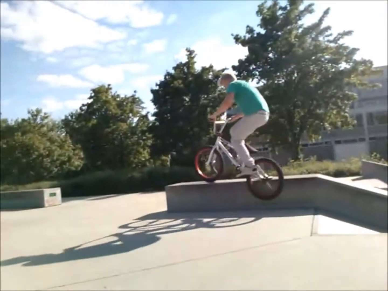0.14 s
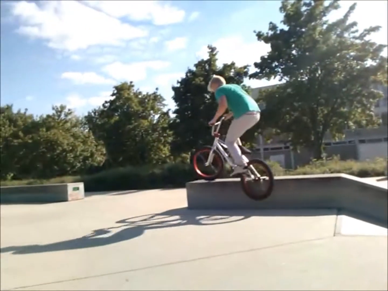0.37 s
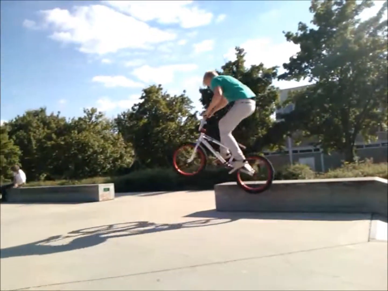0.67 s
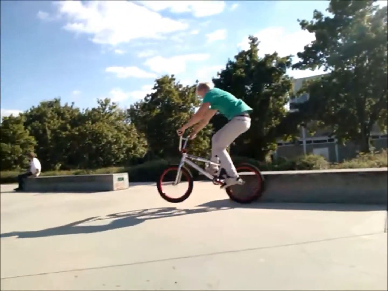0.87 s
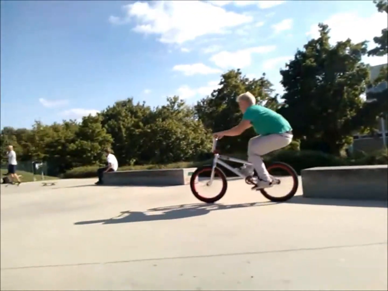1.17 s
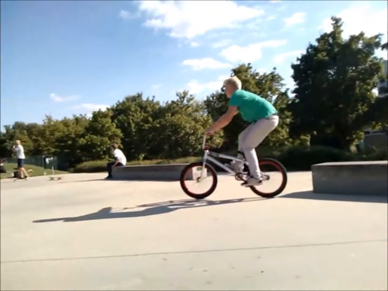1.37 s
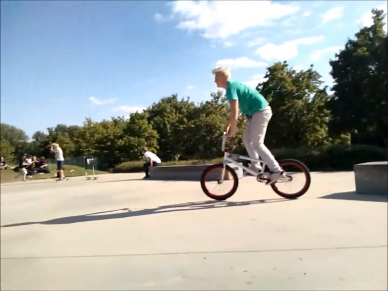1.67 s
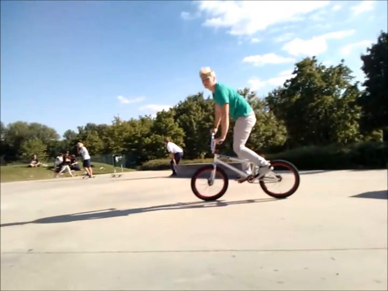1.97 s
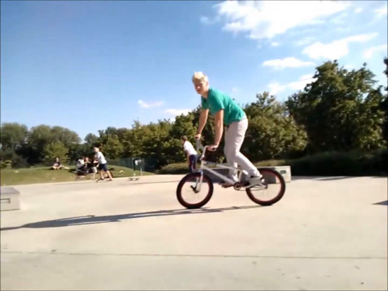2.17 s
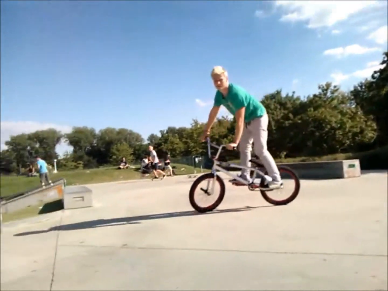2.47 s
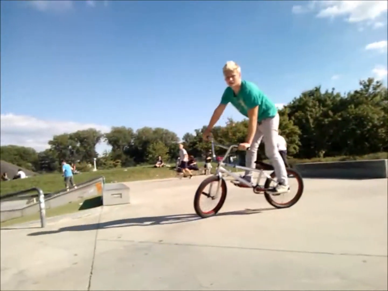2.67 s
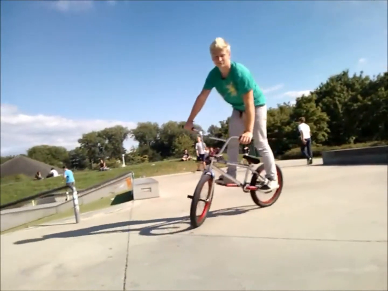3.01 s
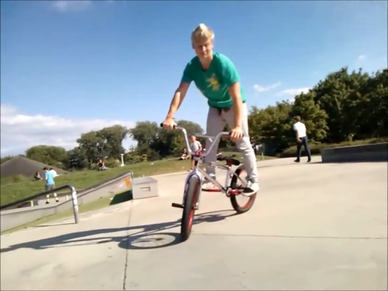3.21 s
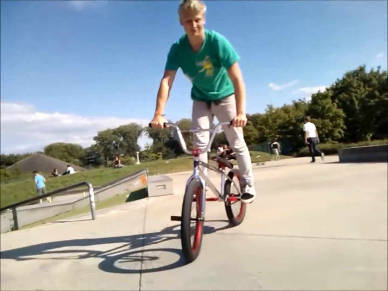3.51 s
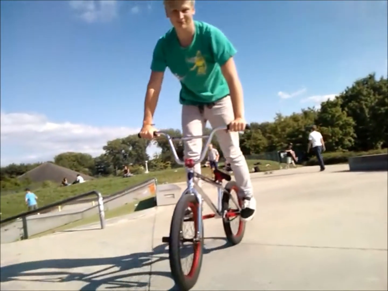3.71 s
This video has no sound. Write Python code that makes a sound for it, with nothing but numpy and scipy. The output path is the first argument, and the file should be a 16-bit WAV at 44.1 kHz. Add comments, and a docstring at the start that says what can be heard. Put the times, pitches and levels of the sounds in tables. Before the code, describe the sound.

A small bike's metal pegs crack onto a concrete ledge, it hops down with a rattling chain, then coasts with a ticking freewheel hub. Open skatepark, faint distant knocks, slightly clipped narrow-band microphone.

```python
"""Steel pegs slam onto a ledge in a concrete skatepark; the small bike hops off, lands and rattles.
It then rolls on, the freewheel ticking more slowly at the end, amid distant knocks, tyre and air noise.
Impacts are enveloped noise bands; tubes, hub and tyres are damped sinusoids; the chain is random taps.
A diffuse echo of the park is mixed in, and a narrow-band microphone clips the loudest blows."""
import sys
import numpy as np
from scipy import signal
from scipy.fft import rfft, irfft, next_fast_len
from scipy.io import wavfile
from scipy.ndimage import map_coordinates

SR = 44100
rng = np.random.default_rng(int(sys.argv[2]) if len(sys.argv) > 2 else 0)


def to_wav(sig):
    """Store sig (one row per channel, or 1-D mono) as 16-bit WAV at the path in sys.argv[1].

    Samples outside -1..1 are clipped; the rate is SR.
    """
    pcm = np.clip(np.atleast_2d(sig), -1, 1) * 32767
    pcm = np.round(pcm).astype(np.int16)
    wavfile.write(sys.argv[1], SR, pcm.T)  # frames by channels


N = 169785

# Noise spectrum of a bright crack. Each row: frequency in Hz, relative level in dB.
CRACK_SPECTRUM = [(1200, -16), (2300, -7.5), (3000, 10.5), (3500, 2), (4000, -8.5), (5600, -21)]
# Noise spectrum of a hard clack. Each row: frequency in Hz, relative level in dB.
CLACK_SPECTRUM = [(300, -15.5), (900, -2.5), (1400, 4), (2000, 7), (2400, 2), (6000, -26.5)]
# Noise spectrum of the finest treble. Each row: frequency in Hz, relative level in dB.
FIZZ_SPECTRUM = [(3300, -28.5), (4000, 2), (5000, -5), (5700, -10)]
HIT_ATTACK_S = 0.001


def amp(db):
    """Decibels as an amplitude ratio: 20 dB is a factor of ten."""
    return 10 ** (np.asarray(db) / 20)


def unit(x):
    """Normalisation to an rms of 1."""
    return x / np.sqrt(np.mean(x ** 2) + 1e-20)


def along(points, hz):
    """Linear interpolation of (Hz, value) points on a logarithmic frequency axis."""
    f, v = np.transpose(points)
    return np.interp(np.log(hz + 1), np.log(f + 1), v)


def filtered(x, response):
    """Linear filtering: the spectrum multiplied by a frequency response."""
    m = next_fast_len(N + SR // 2)  # zero padding leaves room for the filter's tail
    hz = np.fft.rfftfreq(m, 1 / SR)
    return irfft(rfft(x, m) * response(hz), m)[..., :N]


def noise(spectrum):
    """Coloured noise: white noise shaped by a spectrum, with an rms of 1."""
    white = rng.standard_normal(N)
    return unit(filtered(white, lambda hz: amp(along(spectrum, hz))))


def wobble(rate):
    """Slow random modulation: a smooth curve through random knots, rate of them a second."""
    knots = rng.standard_normal(int(N * rate / SR) + 4)
    return map_coordinates(knots, [np.arange(N) * rate / SR])


def fade(t, attack, t60):
    """Impulsive excitation and loss: a quick rise, then exponential decay by 60 dB in t60."""
    return (1 - np.exp(-t / attack)) * amp(-60 * t / max(t60, .004))


def ring(modes, t, scatter_db):
    """Modal superposition: damped sinusoids, each with a slightly random level and tuning."""
    total = np.zeros(len(t))
    for hz, db, t60 in modes:
        decay = amp(db + scatter_db * rng.normal() - 60 * t / t60)
        tuning = 1 + 0.0017 * rng.normal()
        total += decay * np.sin(2 * np.pi * hz * t * tuning)
    return total


def add(track, s, sound):
    """Linear superposition: mixes a sound into the track from s seconds."""
    part = track[round(s * SR):][:len(sound)]
    part += sound[:len(part)]


def echo(x):
    """Diffuse reverberation: convolution with noise whose decay time depends on frequency."""
    # Echo of ramps and ledges. Each row: frequency in Hz, t60 in seconds.
    park_decay = [(200, 0.53), (1500, 0.35), (5000, .15)]
    hz, t, z = signal.stft(rng.standard_normal(SR // 2), SR, nperseg=256)
    decay = amp(-60 * t / along(park_decay, hz)[:, None])
    tail = signal.istft(z * decay, SR, nperseg=256)[1]
    delayed = np.pad(x, (400, 0))  # samples before the first reflection
    return signal.fftconvolve(delayed, tail / np.linalg.norm(tail))[:N]


def rolling():
    """Rough-surface and air noise: rumble, hiss and fizz, each an unsteady random band."""
    # Course of the three bands. Each row: time in seconds, rumble, hiss and fizz levels in dB.
    levels = [(0, -38.5, -27.5, -55), (.2, -34.5, -30.5, -45.5), (.4, -41, -39.5, -55),
              (.62, -36.5, -35, -46.5), (0.899, -33.5, -33.5, -51.5), (1.06, -37.5, -42.5, -59.5),
              (1.3, -37, -44.5, -59), (1.71, -38.5, -48, -56.5), (1.85, -33.5, -45.5, -50),
              (2.12, -36.5, -40.5, -54.5), (2.45, -34.5, -40.5, -50), (2.95, -37.5, -46, -60),
              (3.45, -36, -40.5, -55), (3.85, -37, -40, -53)]
    # Low band. Each row: frequency in Hz, relative level in dB.
    rumble_spectrum = [(15, -52), (25, -5.5), (118, -3.5), (155, -2), (403, -3), (508, -5), (680, -2.5),
                       (2600, -12), (3400, -47)]
    # Middle band. Each row: frequency in Hz, relative level in dB.
    hiss_spectrum = [(1500, -16.5), (2200, -1), (3100, 4.5), (3500, 1.5), (3900, -18), (4500, -45)]
    at, *levels_db = np.transpose(levels)
    t, total = np.arange(N) / SR, np.zeros(N)
    shared_db = 0.81 * wobble(4.82)
    for db, spectrum in zip(levels_db, (rumble_spectrum, hiss_spectrum, FIZZ_SPECTRUM)):
        level_db = np.interp(t, at, db) + shared_db + 2.3 * wobble(40)
        total += amp(level_db) * noise(spectrum)
    return total


def impacts(rows):
    """Broadband collision: crack, thud and clack noises snap at contact and die together."""
    # Low band of a hit. Each row: frequency in Hz, relative level in dB.
    thud_spectrum = [(60, -23), (175, -11), (280, -1), (600, 0.5), (900, 1.5), (1400, -4.5), (6000, -34)]
    snap_db, snap_t60_s = 2.5, 0.0043
    t, envelopes = np.arange(SR // 3) / SR, np.zeros((3, N))
    for s, *levels_db, t60 in rows:
        body = fade(t, HIT_ATTACK_S, t60)
        snap = amp(snap_db) * fade(t, HIT_ATTACK_S, snap_t60_s)
        for track, db in zip(envelopes, levels_db):
            add(track, s, amp(db) * (body + snap))
    spectra = CRACK_SPECTRUM, thud_spectrum, CLACK_SPECTRUM
    return sum(envelope * noise(spectrum) for envelope, spectrum in zip(envelopes, spectra))


def park_knocks():
    """Distant collisions: the same broadband impacts, without ringing tubes."""
    # Knocks across the park. Each row: start in seconds, crack, thud and clack levels in dB, t60 in seconds.
    knocks = [(1.284, -24, -26, -28.5, 0.038), (1.7285, -19.5, -29.5, -12.5, 0.07),
              (1.752, -29.5, -27.5, -31, 0.23), (1.844, -37, -40, -26, 0.15), (1.9, -45, -33, -29, 0.081),
              (2.004, -33, -21.5, -19.5, 0.047), (2.023, -33, -26, -25.5, 0.12),
              (2.125, -29, -18, -23.5, 0.03), (2.37, -29.5, -23.5, -20, 0.043),
              (3.064, -57, -34.5, -41, 0.53), (3.167, -30.5, -20, -27, 0.058),
              (3.183, -36.5, -30.5, -25, 0.035), (3.486, -24.5, -30.5, -29, 0.098),
              (3.686, -35, -20, -32, 0.033)]
    return impacts(knocks)


def chain():
    """Random (Poisson-like) collisions: links tap at chance moments, fading after each jolt."""
    # Loose metal, mostly the chain, after hard jolts. Each row: start in seconds, level in dB, t60 in seconds.
    chatter = [(0.739, -30.5, 0.64), (0.859, -23, 0.59), (1.101, -21.5, 0.34)]
    taps_per_s, link_t60_s = 180, 0.01
    t, jolts = np.arange(SR // 2) / SR, np.zeros(N)
    for s, db, t60 in chatter:
        add(jolts, s, amp(db) * fade(t, 0.0017, t60))
    happens = rng.random(N) < taps_per_s / SR
    taps = happens * amp(2.9 * rng.standard_normal(N))  # level scatter in dB
    link_decay = amp(-60 * t[:SR // 20] / link_t60_s)
    links = signal.fftconvolve(taps * jolts, link_decay)[:N]
    colour = noise(CRACK_SPECTRUM) + amp(-1.0) * noise(CLACK_SPECTRUM) + amp(-12.5) * noise(FIZZ_SPECTRUM)
    return links * colour


def freewheel():
    """Impulsive excitation of modes: each pawl drop gives a beating ping, rough noise and shell ringing."""
    # Pawl drops. Each row: start in seconds, level in dB, pitch in Hz.
    ticks = [(1.2246, -19.5, 3220), (1.2516, -18, 3120), (1.275, -15.5, 3290), (1.302, -17.5, 3090),
             (1.3238, -16.5, 3090), (1.342, -19, 3120), (1.363, -17, 3070), (1.3852, -14.5, 3240),
             (1.413, -16, 3090), (1.4418, -20.5, 2970), (1.469, -17.5, 3054), (1.5208, -16.5, 3196),
             (2.1926, -22, 3340), (2.218, -16.5, 3130), (2.243, -21.5, 3250), (2.266, -18.5, 3100),
             (2.2884, -19, 3340), (2.308, -21.5, 3150), (2.3277, -20.5, 3200), (2.348, -20.5, 3260),
             (2.366, -15.5, 3210), (2.3868, -19, 2930), (2.4064, -22.5, 3410), (2.4285, -18.5, 3200),
             (2.4497, -17, 3196), (2.474, -23, 3550), (2.495, -19, 3040), (2.5232, -21.5, 3350),
             (2.549, -20.5, 3210), (2.573, -20, 3320), (2.5954, -21.5, 3170), (2.6206, -16.5, 3410),
             (2.647, -19, 3270), (2.6736, -23, 3110), (2.699, -15.5, 3270), (2.722, -17, 3014),
             (2.7452, -18.5, 3450), (2.77, -17, 3140), (2.798, -15, 3235), (2.8246, -14.5, 3050),
             (2.8483, -20, 3420), (2.8756, -15, 3160), (2.9025, -15, 3346), (2.9322, -19.5, 3490),
             (2.9628, -20, 3250), (2.9933, -21, 3100), (3.0263, -21.5, 3200), (3.0578, -20.5, 3230),
             (3.0902, -19.5, 3190), (3.1234, -19.5, 3370), (3.1555, -22, 3520), (3.1877, -22, 3350),
             (3.2217, -21, 3380), (3.254, -18, 3250), (3.286, -24, 3200), (3.3184, -18.5, 3280),
             (3.349, -22, 3320), (3.3838, -19, 3290), (3.4136, -20, 3430), (3.4446, -24.5, 2840),
             (3.479, -16.5, 3330), (3.5132, -16.5, 3360), (3.5492, -17.5, 3320), (3.588, -19.5, 3140),
             (3.6291, -21, 3320), (3.679, -21, 3360), (3.72, -21, 3060), (3.7662, -26, 3330),
             (3.8154, -21, 3090)]
    # Low mode of the hub shell. Each row: frequency in Hz, level in dB, t60 in seconds.
    low_modes = [(2334, -0.48, 0.028)]
    # High modes of the hub shell. Each row: frequency in Hz, level in dB, t60 in seconds.
    high_modes = [(3750, -6.5, 0.063), (4224, -2.5, 0.013), (4910, -7, 0.014), (5450, -12.5, .015)]
    # Shell level as the wheel turns past the microphone. Each row: time in seconds, low and high levels in dB.
    facing = [(1.2, -27, -24), (1.55, -5, -18), (2.2, -20, -8), (2.5, -12.5, -21), (2.801, -14.5, -18),
              (2.96, -1, -6), (3.17, 0, -8.5), (3.3, -8.5, -12), (3.85, -15, -7.5)]
    attack_s, ping_t60_s, tail_t60_s, snap_t60_s = 0.00085, 0.029, 0.052, 0.005
    tail_db, snap_db = -13, -18
    beat_ratio, spread_hz = 0.48, 228  # amplitude and least offset of the second partial
    t, pings, roughness = np.arange(SR // 10) / SR, np.zeros(N), np.zeros(N)
    at, low_db, high_db = np.transpose(facing)
    rise, ping_shape = 1 - np.exp(-t / attack_s), fade(t, attack_s, ping_t60_s)
    rough = amp(tail_db) * fade(t, attack_s, tail_t60_s)
    rough += amp(snap_db) * fade(t, attack_s, snap_t60_s)
    for (s, db, hz), off in zip(ticks, rng.standard_normal(len(ticks))):
        second_hz = hz + spread_hz * (np.sign(off) + off / 2)
        pair = np.sin(2 * np.pi * hz * t) + beat_ratio * np.sin(2 * np.pi * second_hz * t)
        shell = amp(np.interp(s, at, low_db)) * ring(low_modes, t, scatter_db=3)
        shell += amp(np.interp(s, at, high_db)) * ring(high_modes, t, scatter_db=3)
        add(pings, s, amp(db) * (ping_shape * pair + rise * shell))
        add(roughness, s, amp(db) * rough)
    return pings + roughness * (noise(CRACK_SPECTRUM) + amp(-10) * noise(FIZZ_SPECTRUM))


def bike():
    """Struck resonators: broadband blows with steel-tube modes, low thumps and short pings; a few of the pings
    ring with the distant knocks."""
    # Blows on the bike. Each row: start in seconds, crack, thud, clack and frame ring levels in dB, t60 in seconds.
    blows = [(.007, -21.5, -31, -25.5, -32.5, 0.088), (.037, -7, -2, -1.5, -12.5, 0.012),
             (.046, 1.5, -16, 0.5, -8.5, 0.11), (.059, -28, -8, -9, -4, .12),
             (.078, -27, -6, -18, -12, 0.071), (.109, -25, -13, -25.5, -16.5, 0.053),
             (.14, -18.5, -16, -25, -38, 0.031), (0.2217, -11.5, -11, -11, -42, 0.026),
             (0.3334, -19, -10, -11.5, -30, 0.068), (.345, -18, -9.5, -7.5, -32, 0.03),
             (.354, -37, -16.5, -16.5, -28, 0.066), (0.669, -29, -27, -18, -31, 0.12),
             (.733, -7, -14.5, -15, -16, 0.096), (.807, -19.5, -16.5, -18.5, -25, 0.082),
             (.861, -25.5, -19, -17, -37, 0.054), (0.879, -30, -31, -30, -38, 0.47),
             (0.976, -30.5, -28, -30, -26.5, 0.084), (1.012, -25, -41.5, -29.5, -42, 0.052),
             (1.099, -11.5, -28, -17.5, -37, 0.024), (1.151, -25.5, -29.5, -26, -60, 0.055),
             (1.177, -45, -39.5, -19.5, -50, 0.061)]
    # Modes of the steel tubes. Each row: frequency in Hz, level in dB, t60 in seconds.
    frame_modes = [(263, -17, 0.25), (609, -10.5, 0.16), (782, -1, 0.094), (826, -11, 0.35),
                   (1850, -8.5, 0.015), (2754, -11, 0.17), (2970, -4, 0.055), (3095, 0, 0.13)]
    # Tyres and decks taking weight. Each row: start in seconds, level in dB, frequency in Hz, t60 in seconds.
    thumps = [(.046, -17.5, 108, 0.14), (0.337, -28, 105, 0.11), (0.734, -27, 91, 0.16),
              (1.104, -28, 94, 0.1), (3.165, -11.5, 260, 0.039), (.345, -9, 546, 0.079),
              (.669, -18.5, 292, 0.099), (.734, -14.5, 261, 0.084), (.808, -21, 280, 0.077),
              (0.858, -16, 264, 0.054)]
    # Hard contacts with one clear note: on the bike, and from 1.72 to 2.13 s the deck notes of distant knocks.
    # Each row: start in seconds, level in dB, frequency in Hz, t60 in seconds.
    clear_notes = [(0.163, -17, 1353, 0.098), (.3435, 1, 1997, 0.028), (0.935, -16.5, 3900, 0.0092),
                   (1.0991, -4, 2870, .01), (1.1137, -4.5, 2930, 0.0088), (2.1265, -17.5, 705, 0.031),
                   (1.7294, -10, 1830, 0.023), (1.7439, -4.5, 2950, 0.0081), (2.0042, -13, 1800, .025),
                   (2.0218, -18, 1850, .015)]
    t, tones, hits = np.arange(SR // 3) / SR, np.zeros(N), []
    for s, crack_db, thud_db, clack_db, ring_db, t60 in blows:
        add(tones, s, amp(ring_db) * ring(frame_modes, t, scatter_db=3))
        hits.append((s, crack_db, thud_db, clack_db, t60))
    for rows, attack_s in ((thumps, 0.0055), (clear_notes, HIT_ATTACK_S)):
        for s, db, hz, t60 in rows:
            add(tones, s, amp(db) * fade(t, attack_s, t60) * np.sin(2 * np.pi * hz * t))
    return tones + impacts(hits)


def scene():
    """Superposition of direct sound, echo and background, each source with its own echo level."""
    near, far, hub = bike() + chain(), park_knocks(), freewheel()
    near_echo_db, far_echo_db, hub_echo_db = -15.5, -9, -13.5
    wet = echo(amp(near_echo_db) * near + amp(far_echo_db) * far + amp(hub_echo_db) * hub)
    return (near + far + hub + wet + rolling())[None]


def record(dry):
    """Band limiting and saturation: bass loss, a clip, a cut near 6 kHz, then a clip of the overshoot."""
    bass_corner_hz, band_top_hz, final_top_hz = 113, 5750, 16000
    input_clip, output_clip = 1.014, 1.0

    def bass_loss(hz):
        """First-order high-pass response."""
        return 1j * hz / (bass_corner_hz + 1j * hz)

    def treble_cut(hz):
        """Attenuation growing in dB per Hz, more steeply above the band's top."""
        gentle_db = np.clip((hz - band_top_hz + 350) * 0.022, 0, 120)
        steep_db = np.clip((hz - band_top_hz) * 0.08, 0, 120)
        return amp(-gentle_db - steep_db)

    def final_cut(hz):
        """Low-pass slope that bounds the harmonics made by the second clip."""
        return amp(-np.clip((hz - final_top_hz + 500) * .1, 0, 120))

    clipped = np.clip(filtered(dry, bass_loss), -input_clip, input_clip)
    narrow = filtered(clipped, treble_cut)
    return filtered(np.clip(narrow, -output_clip, output_clip), final_cut)


dry = scene()
out = record(dry)
to_wav(out)
```